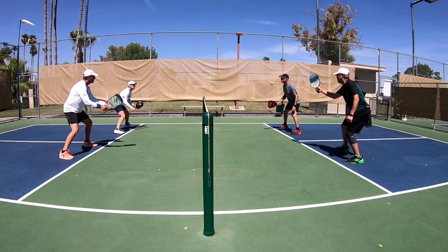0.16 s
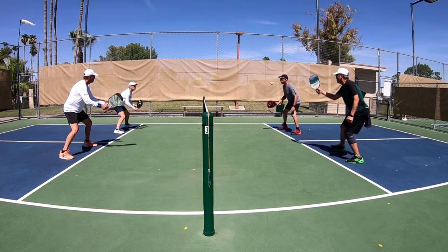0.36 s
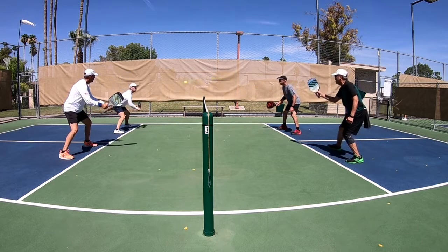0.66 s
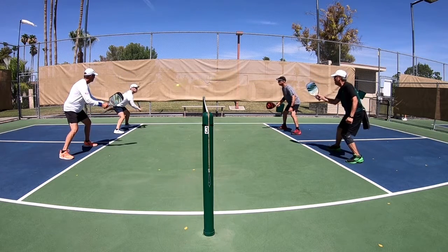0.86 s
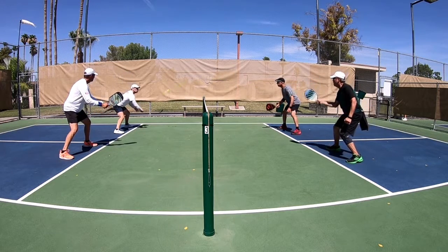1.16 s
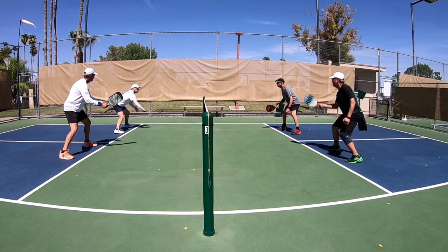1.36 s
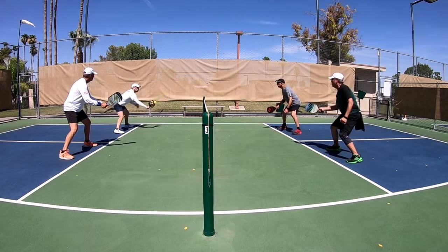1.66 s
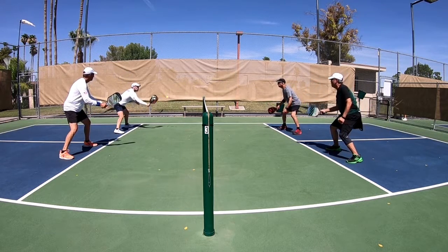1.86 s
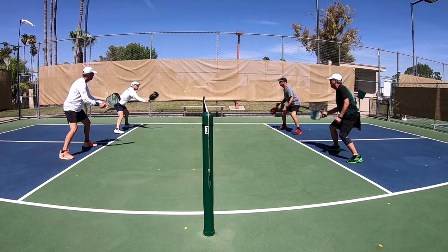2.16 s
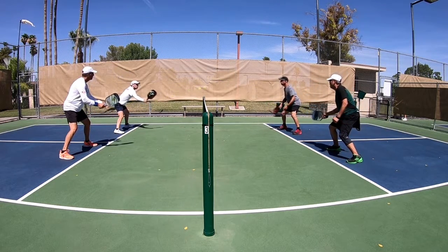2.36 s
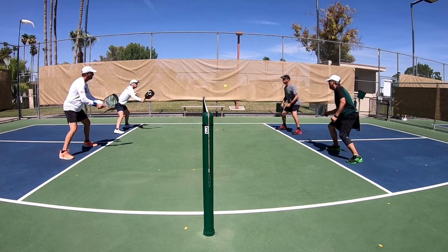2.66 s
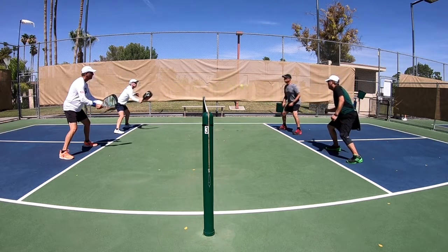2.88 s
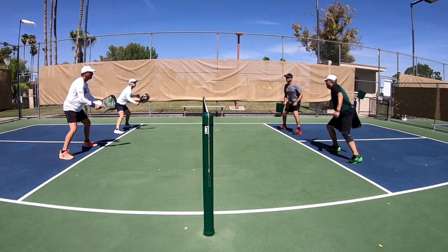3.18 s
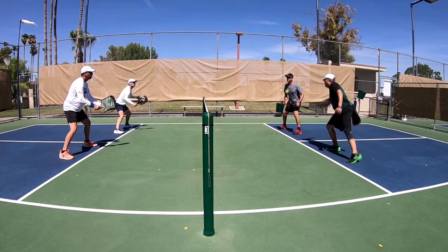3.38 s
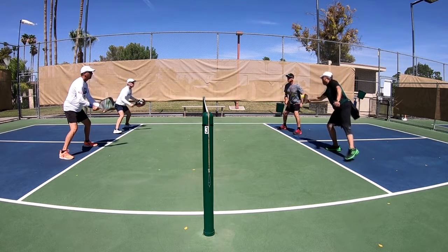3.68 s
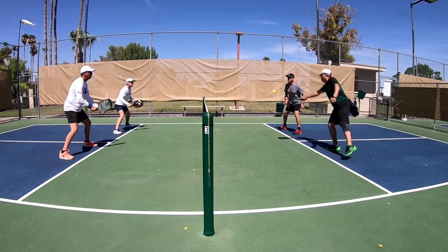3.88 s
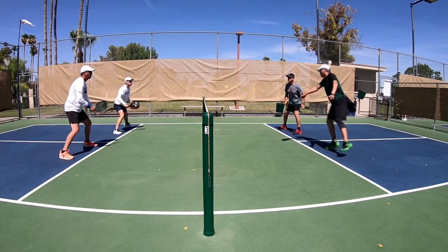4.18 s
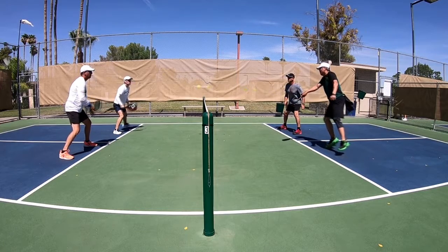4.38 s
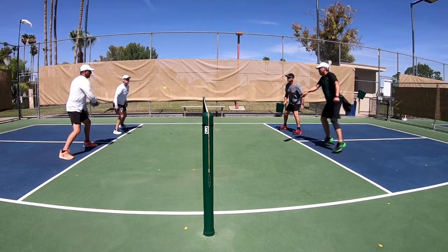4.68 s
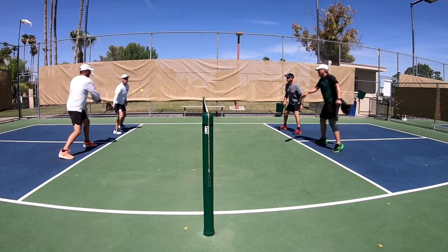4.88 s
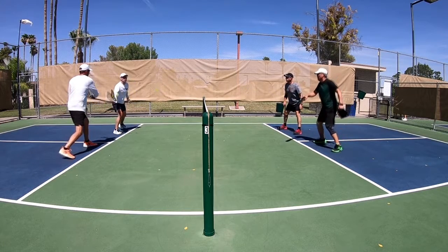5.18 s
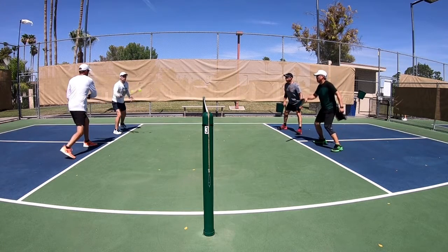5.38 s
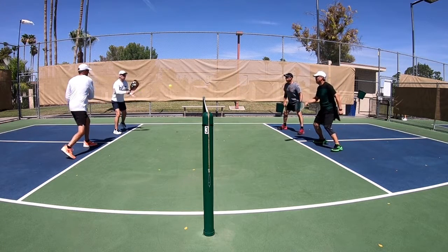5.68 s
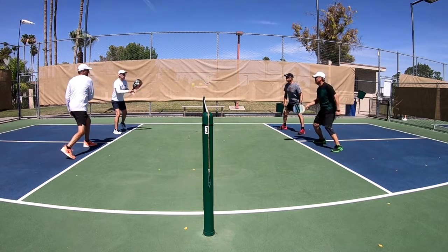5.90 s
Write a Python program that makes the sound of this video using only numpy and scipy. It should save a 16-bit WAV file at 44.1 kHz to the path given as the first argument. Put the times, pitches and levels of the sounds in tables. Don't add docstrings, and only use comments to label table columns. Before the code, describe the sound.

Quiet outdoor air and soft bass wind buffets, heard in stereo from courtside. Three slowed paddle strikes on a hollow plastic ball stand out: a mid-toned pock, then a heavy low ringing thud with a long scattered echo, then a hard bright crack. Between them come faint sole scuffs, dull distant knocks and one wavering shoe squeak just before the last hit. Wind grows stronger in the second half.

```python
import sys
import numpy as np
from scipy import signal
from scipy.fft import rfft, irfft
from scipy.io import wavfile
from scipy.ndimage import uniform_filter1d

SR = 44100
rng = np.random.default_rng(int(sys.argv[2]) if len(sys.argv) > 2 else 0)


def wav_out(sig):
    wavfile.write(sys.argv[1], SR, np.round(np.clip(np.atleast_2d(sig).T, -1, 1) * 32767).astype(np.int16))


def natural_amplitude(level_db):
    exponent = np.asarray(level_db, float) / 20
    return 10 ** exponent


N = 266364

# start in seconds, level in dB, treble against bass in dB,
# smear in seconds, left minus right in dB.
WALL_ECHOES = [
    [(1.642, -52.5, -7.5, 0.014, -3), (1.66, -50, -8, 0.018, 7), (1.682, -52, -5, 0.01, 2),
     (1.729, -43.5, 1.5, 0.0055, 1), (1.758, -52, -8, 0.023, -25.5), (1.819, -52.5, -10, 0.01, -24.5),
     (1.984, -73.5, -14, 0.019, 2.5)],
    [(3.622, -31, -14, 0.011, 7), (3.642, -36, -4, 0.0065, 3.5), (3.681, -36.5, -3, 0.0036, 2.5),
     (3.6905, -27.5, -9.5, 0.0016, -8.5), (3.697, -36.5, -3.5, 0.0072, 0), (3.712, -43.5, 3.5, 0.011, -3),
     (3.744, -37, -12, 0.0074, -2.5), (3.775, -38.5, -4.5, 0.02, -2.5), (3.82, -44, -1, 0.039, -3.5),
     (3.754, -35.5, -10, 0.011, 2), (3.882, -41, -21.5, 0.021, -8), (3.925, -48.5, -11, 0.018, 3),
     (3.965, -46, -15, 0.014, -0.5), (4.025, -43, -16, 0.0069, 1.5), (4.063, -45.5, -18, 0.016, -1),
     (4.11, -50, -15.5, 0.03, 3), (4.19, -53.5, -12, 0.04, -1.5), (4.545, -53, -6.5, .025, -4.5)],
    [(5.131, -36, -12, 0.011, 6.5), (5.15, -38, -14, 0.0094, -1.5), (5.188, -47.5, -2.5, 0.015, 4),
     (5.213, -45, -10, 0.012, 4.5), (5.255, -41, -8, 0.005, 1.5), (5.268, -42.5, -7, 0.012, -3),
     (5.297, -49.5, -6, 0.0091, -6.5), (5.37, -51, -10.5, 0.036, 3.5), (5.314, -49, -13, 0.024, -5),
     (5.454, -50, -35, 0.0068, -11), (5.505, -49.5, -28, 0.008, -2)],
]


def evened(x):
    return x / np.sqrt(np.mean(x ** 2) + 1e-20)


def steady(x, span):
    return x / np.sqrt(uniform_filter1d(x ** 2, span, axis=1) + 1e-20)


def soft(gain):
    return uniform_filter1d(uniform_filter1d(gain, size=60), size=60)


def read(points, hz):
    f, value = np.transpose(points)
    return np.interp(np.log(hz + 1), np.log(f + 1), value)


def band(x, lo_hz, hi_hz):
    return signal.sosfilt(signal.butter(2, [lo_hz, hi_hz], "band", fs=SR, output="sos"), x)


def below(x, hz):
    return signal.sosfilt(signal.butter(8, hz, fs=SR, output="sos"), x)


def add(mix, s, sound, pan_db):
    lag = round(0.6 * pan_db / 2)
    ports = natural_amplitude([[pan_db / 2], [-pan_db / 2]]) * sound
    for channel, port, shift in zip(mix, ports, (-lag, lag)):
        part = channel[round(s * SR) + shift:][:len(port)]
        part += port[:len(part)]


def noise(colour_db, same, patchy_db, size=1024):
    frames, hz = N * 4 // size + 5, np.fft.rfftfreq(size, 1 / SR)[:, None]
    a, b, c, d, patches = rng.standard_normal((frames, len(hz), 5)).T
    patches = uniform_filter1d(patches, size=8, axis=0)
    patches = evened(uniform_filter1d(patches, size=10, axis=1))
    same, left = np.clip(same, -1, 1), a + 1j * b
    right = same * left + np.sqrt(1 - same ** 2) * (c + 1j * d)
    z = np.array([left, right]) * natural_amplitude(colour_db(hz) + patchy_db * patches)
    return signal.istft(z, nperseg=size, noverlap=size * 3 // 4)[1][:, :N]


def ring(modes, tilt_db, damping):
    t = np.arange(SR // 8) / SR
    wave = np.zeros(len(t))
    for hz, width, db in modes:
        decay = np.exp(-np.pi * (width + damping * hz) * t)
        wave += natural_amplitude(db + tilt_db * (hz > 900)) * decay * np.sin(2 * np.pi * hz * t)
    push = 1 - np.exp(-t / 0.00083)
    wave = band(wave * push, 0.5 * modes[0][0], 2100)
    return -wave / abs(wave).max()


def crack(length, top_db=0):
    # frequency in Hz, level in dB.
    skin = [(1500, -15.5), (2500, -31), (3500, -31.5), (4500, -49.5), (5700, -52), (7000, -50.5),
            (9000, -47), (15000, -58)]
    t = np.arange(SR // 8) / SR
    hz = np.fft.rfftfreq(len(t), 1 / SR)
    z = rfft(rng.standard_normal((2, len(t)))) * natural_amplitude(read(skin, hz) + top_db * (hz > 4300))
    burst = evened(irfft(z + .6 * z[::-1], len(t)))
    return burst * (1 - np.exp(-t / .0004)) * np.exp(-t / length)


def blows():
    # start
    # in seconds, level in dB, treble against bass in dB, left minus right in dB.
    contacts = [
        [(1.5772, -34.5, -20.5, 2), (1.5800, -27.5, -0.5, 4.5), (1.5822, -24, -24.5, 4), (1.589, -41, 2, -1),
         (1.594, -37, -25.5, -4), (1.603, -55, -4, 1), (1.611, -45.5, -4.5, -4), (1.616, -47, -2.5, -1),
         (1.622, -48, 0.5, 2), (1.627, -51, -4.5, 5), (1.7295, -50, 3, -1)],
        [(3.5652, -19.5, -2, 5), (3.5675, -18, -26, -5.5), (3.5712, -33.5, 3.5, -5.5), (3.575, -32.5, 2.5, -1),
         (3.5792, -29.5, -3, -3.5), (3.592, -46, 2.5, 1), (3.599, -42, 0, 2.5), (3.603, -39.5, -0.5, -7.5),
         (3.613, -43, -10, 3), (3.6915, -41, -5.5, -4.5)],
        [(5.0885, -23, -12, 7), (5.0925, -38, 3, -2), (5.0975, -27.5, -10, 8.5), (5.1005, -34.5, -22, 8),
         (5.105, -45.5, 12, 3.5), (5.11, -47.5, 8.5, 3.5), (5.2565, -49, -5, 2)],
    ]
    # frequency in Hz, width in Hz, level in dB.
    paddles = [
        [(416.3, 57, 1), (197, 72, -12.5), (555, 64, -16.5), (703, 45, -14), (910, 67, -14), (1273, 77, -15),
         (1518, 90, -17), (1660, 126, -12.5), (1980, 110, -28), (2480, 160, -21)],
        [(265.7, 29.6, 6), (316, 31, -7), (420, 63, -9), (760, 28, -12), (527, 36, -0.5), (674, 42, -3),
         (950, 52, -6), (1026, 45, -16), (1370, 120, -13), (1447, 66, -13.5), (1566, 57, -9), (1890, 40, -21.5),
         (2370, 80, -22)],
        [(189.6, 22.5, -1.5), (475, 39, -5), (835, 160, -13.5), (957, 42, -10), (1150, 36, -10), (1290, 60, -6),
         (1540, 157, 4.5), (1760, 194, 10), (1980, 124, 0.5), (2170, 210, -15.5), (2760, 270, -21.5)],
    ]
    # crack in dB, its change in the returns in dB, its lift above 4.3 kHz in dB.
    crack_levels = [-38, -48.5, -34]
    crack_lates = [-11.5, 1.5, -2]
    crack_tops = [-9.5, -4.5, 1]
    mix, t = np.zeros((2, N)), np.arange(SR // 8) / SR
    for hits, modes, echoes, crack_db, late_db, top_db in zip(
            contacts, paddles, WALL_ECHOES, crack_levels, crack_lates, crack_tops):
        for s, db, treble_db, pan_db in hits:
            add(mix, s, natural_amplitude(db) * ring(modes, treble_db + 14.0, 0.0023), pan_db)
            is_return = s > hits[0][0] + .005
            skin_db = crack_db + db + treble_db + 33.0 + late_db * is_return
            add(mix, s, natural_amplitude(skin_db) * crack(0.0038, top_db), 0.4 * pan_db)
        for s, db, treble_db, smear, pan_db in echoes:
            rise = 1 - np.exp(-t / max(0.19 * smear, .0003))
            fall = np.exp(-(t / max(1.4 * smear, .001)) ** 2)
            wall = rng.standard_normal((2, len(t))) * rise * fall
            ringing = ring(modes, treble_db + 10.5, 0.0078)[None]
            echo = signal.fftconvolve(wall + 0.078 * wall[::-1], ringing, axes=1)
            add(mix, s, natural_amplitude(db - 5.0) * echo / abs(echo).max(), pan_db)
            skin = band(crack(max(smear, .001)), 1600, 4900)
            add(mix, s, natural_amplitude(crack_db + db + treble_db + 27.0) * skin, pan_db)
    return mix + np.array([[-1], [1]]) * 0.14 * band(mix, 1000, 3000)


def falling(since, db, db_per_s):
    return (since > 0) * natural_amplitude(db - db_per_s * abs(since)) ** 2


def answer(since, db, length):
    return (since > 0) * natural_amplitude(db) ** 2 * np.exp(-(since / length) ** 2)


def tails():
    # frequency in Hz, level in dB.
    colours = [
        [(88, -47.5), (150, -17.5), (189, -1), (413, -5.5), (494, -19.5), (576, -8.5), (868, -21.5),
         (1630, -13.5), (3210, -39.5), (4170, -78.5), (7060, -120)],
        [(88, -70.5), (150, -16), (215, -36.5), (257, 4), (345, -1.5), (463, -9.5), (547, -10.5), (663, -22),
         (1470, -29.5), (3210, -51.5), (4170, -67), (7060, -120)],
        [(88, -36), (150, -26.5), (264, -3), (429, -17.5), (488, -20), (569, -16), (1280, -27), (1900, -25),
         (3210, -58), (4170, -61.5), (7060, -120)],
    ]
    # frequency in Hz, width in Hz.
    tones = [
        (189, 11),
        (260.1, 18),
        (187, 20),
    ]
    starts = [1.588, 3.579, 5.098]
    # return off the court in dB, return from beyond
    # the fences in dB, fall of the latter in dB per second.
    near_levels = [(-48, -33.5, -41.5), (-41.5, -30.5, -49.5), (-35, -38, -47)]
    far_levels = [(-58.5, -54, -56.5), (-54, -50.5, -51), (-56.5, -51, -55.5)]
    far_falls = [(34.3, 36, 30), (22.2, 18.8, 26), (20, 27, 96)]
    near_falls = [509, 605.5, 791]
    # level in dB, length in smears.
    refill_levels = (-23, -11, -8.5)
    refill_spreads = (2.4, 1.6, 1.94)
    mix, now = np.zeros((2, N)), np.arange(N) / SR
    for k, (colour, (tone_hz, width)) in enumerate(zip(colours, tones)):
        since = now - starts[k]
        build = 1 - np.exp(-(since / 0.13) ** 2)
        gains = []
        for near_db, far_db, far_fall, wall_db, spread in zip(
                near_levels[k], far_levels[k], far_falls[k], refill_levels, refill_spreads):
            power = falling(since, near_db, near_falls[k]) + build * falling(since, far_db, far_fall)
            for s, db, _, smear, _ in WALL_ECHOES[k]:
                power += answer(now - s, db + wall_db, spread * max(smear, .002))
            gains.append(soft(np.sqrt(abs(uniform_filter1d(power, size=60)))))
        treble_gain, middle_gain, tone_gain = gains
        treble = noise(lambda hz: read(colour, hz) - 40 * (hz < 650), 0.12, patchy_db=2)
        middle = noise(lambda hz: read(colour, hz) - 40 * (abs(hz - tone_hz - 230) > 190),
                       0.38, patchy_db=1.0)
        tone = noise(lambda hz: np.maximum(-6 * ((hz - tone_hz) / width) ** 2, -120),
                     0.78, patchy_db=4.5, size=4096)
        mix += natural_amplitude(-3.0) * treble_gain * evened(treble)
        mix += middle_gain * evened(middle) + tone_gain * steady(tone, 2600)
    return mix


def lead_ins():
    # start in seconds, end in seconds, start level in dB, end level in dB, low edge in Hz,
    # high edge in Hz.
    rushes = [
        (1.333, 1.594, -76, -66, 506, 1580),
        (3.546, 3.567, -62, -52, 800, 2500),
        (5.011, 5.091, -90.5, -55, 1410, 2330),
        (5.03, 5.095, -70, -60.5, 348, 1310),
        (5.013, 5.092, -90, -80, 2400, 6500),
        (1.563, 1.580, -84, -76, 2300, 3900),
    ]
    mix = np.zeros((2, N))
    for start, end, start_db, end_db, lo_hz, hi_hz in rushes:
        rush = rng.standard_normal((2, SR // 2))[:, :round((end - start) * SR)]
        rush = band(band(rush + 0.13 * rush[::-1], lo_hz, hi_hz), lo_hz, hi_hz)
        rush = evened(below(rush, 1.4 * hi_hz))
        length = rush.shape[1]
        swell = natural_amplitude(np.linspace(start_db, end_db, length)) * signal.windows.tukey(length, .15)
        add(mix, start, swell * rush, 0)
    return mix


def squeaks():
    # start in seconds, length in seconds, first pitch in Hz, last pitch in Hz, level in dB.
    slides = [
        (1.329, 0.17, 1250, 1384, -67),
        (2.6, 0.34, 1016, 761, -78.5),
        (4.839, 0.021, 859, 538, -42.5),
        (4.86, 0.072, 606.5, 674, -40),
        (4.932, 0.105, 648, 680, -62.5),
        (5.013, 0.11, 1980, 2040, -67),
        (4.846, 0.12, 1950, 1940, -67),
    ]
    # left minus right in dB, share of the length at firmest grip,
    # stutter in dB, pitch arch in Hz, grip at the end in dB.
    grips = [(-7, 0.52, -0.5, 168.5, -7), (1.5, 0.32, 3, 0, -11), (-6, 1, 1.5, -3, -8),
             (-6, 0.22, 1.5, 24.5, -24), (-6, 0.22, 5, 21.5, -2.5), (5, 0.81, 1, -17, -10),
             (4, .3, -2, 0, -9)]
    overtones = [1, -17.5, -24]

    def drift(span, length):
        return evened(uniform_filter1d(rng.standard_normal(SR // 2), size=span))[:length]

    mix = np.zeros((2, N))
    for (s, length, first_hz, last_hz, top_db), (pan_db, firmest, stutter_db, arch_hz, end_db) in zip(slides, grips):
        u = np.arange(0, 1, 1 / (length * SR))
        hz = first_hz + (last_hz - first_hz) * u ** 0.71 + arch_hz * np.sin(np.pi * u)
        db = top_db + np.interp(u, [0, np.clip(firmest, .05, .95), 1], [-11.5, 0, end_db])
        turns = np.cumsum(hz * (1 + .04 * drift(150, len(u)))) / SR
        db = db + 2 * drift(350, len(u)) + stutter_db * np.sin(2 * np.pi * 65.5 * length * u)
        rasp = 0.6 + drift(70, len(u))
        tone = np.zeros(len(u))
        for k, overtone_db in enumerate(overtones):
            tone += natural_amplitude(overtone_db) * (rasp if k else 1) * np.sin(2 * np.pi * (k + 1) * turns)
        tone = np.pad(natural_amplitude(db) * tone * signal.windows.tukey(len(u), .2), (0, SR // 50))
        add(mix, s, band(band(tone, 300, 2100), 300, 2100), pan_db)
    return mix


def scuffs():
    # start in seconds, level in dB, top of the band in Hz (the band reaches down to
    # about half of it), length in seconds, left minus right in dB.
    drags = [(0.148, -84, 460, 0.03, -6), (0.459, -71, 440, 0.017, -4), (1.412, -62, 520, 0.042, -3),
             (1.488, -57.5, 497, 0.025, 0), (1.533, -54.5, 554, 0.049, -6), (3.054, -70, 471, 0.014, -2.5),
             (3.206, -67, 484, 0.048, 6), (3.306, -62, 452, 0.049, -4), (3.395, -65.5, 570, 0.036, 10.5),
             (3.465, -57.5, 498, 0.045, 5), (3.512, -48, 450, 0.065, -5), (4.437, -57, 1034, 0.095, 4.5),
             (4.55, -63.5, 478, 0.1, 0), (5.589, -54, 683, 0.057, -5.5), (5.65, -58, 457, 0.03, 3.5),
             (5.708, -62.5, 490, 0.027, 10), (5.737, -66, 447, 0.04, 2), (5.847, -71, 450, 0.047, 11)]
    taps = [(1.533, -73, 2700, 0.0056, -2.5), (4.014, -50.5, 1070, 0.0069, 2),
            (4.037, -67.5, 1980, 0.0086, 8.5), (4.054, -65.5, 1150, 0.0069, 3),
            (4.275, -56.5, 596, 0.012, 6.5), (4.705, -50.5, 527, 0.012, -3), (4.742, -58, 1290, 0.02, 0),
            (4.8148, -50, 997, 0.0065, -5), (4.842, -58.5, 1850, 0.017, -6.5),
            (4.856, -53.5, 1700, 0.015, 10), (4.869, -52.5, 1570, 0.0091, 5), (4.883, -61, 1800, 0.0071, 1),
            (4.965, -63, 1300, 0.023, 0), (4.826, -58.5, 1480, 0.013, 0), (5.614, -56, 1210, 0.036, 3)]
    mix, t = np.zeros((2, N)), np.arange(SR // 4) / SR
    for s, db, hz, length, pan_db in [*drags, *taps]:
        rise = 1 - np.exp(-t / max(0.53 * length, .0005))
        grit = rng.standard_normal((2, len(t))) * rise * np.exp(-t / max(length, .003))
        grit = band(band(grit + 1.6 * grit[::-1], 0.49 * hz, 1.096 * hz), 340, 3800)
        add(mix, s, natural_amplitude(db + 0.5) * grit / abs(grit).max(), pan_db)
    return mix


def knocks():
    # start in seconds, level in dB, frequency in Hz, width in Hz, left minus right in dB.
    hollows = [
        (3.4, -52, 570, 45, 7.5),
        (3.451, -51.5, 550, 52, 5),
        (3.383, -66, 1800, 110, -2),
        (3.558, -45.5, 1100, 100, -2),
        (3.3, -43, 760, 110, -5),
    ]
    mix, t = np.zeros((2, N)), np.arange(SR // 10) / SR
    for s, db, hz, width, pan_db in hollows:
        envelope = (1 - np.exp(-t / .002)) * np.exp(-np.pi * width * t)
        add(mix, s, natural_amplitude(db) * envelope * np.sin(2 * np.pi * hz * t), pan_db)
    return mix


def wind():
    # time in seconds, level in dB, upper wind in dB, left minus right in dB.
    gusts = [(0.01, -40, -18.5, 8.5), (0.199, -43.5, -22.5, 4), (0.511, -31, -28.5, 0),
             (0.767, -44, -14, -7.5), (0.883, -55, -12.5, 6.5), (1.009, -34.5, -31, 0),
             (1.586, -37.5, -6, -4), (1.851, -31, -20, 6), (2.109, -31, -15, 2.5), (2.495, -44.5, -20, 3.5),
             (2.681, -36.5, -21, 5), (2.885, -37, -34, -4), (3.085, -38.5, -9, 7.5), (3.2, -30, -23, 11),
             (3.29, -32, -23.5, 13), (3.415, -36.5, -29, 15), (3.691, -23, -21.5, 5.5),
             (3.965, -29, -21, 15.5), (4.108, -28, -19, 11), (4.201, -25.5, -23, 9.5),
             (4.305, -27.5, -18, 2.5), (4.475, -40, -16, -9), (4.717, -30, -24, 11.5), (4.881, -28, -22, 9),
             (5.157, -29, -23, -2.5), (5.256, -30, -17.5, 11.5), (5.59, -51, -13, 4),
             (5.69, -33.5, -17, 7.5), (5.862, -42, -24, 1.5), (5.951, -36.5, -24, -1.5)]
    breeze = [
        (0.0, -41.5, -15, 1),
        (1.3, -38.5, -18.5, -1),
        (2.9, -37, -22.5, 0),
        (3.1, -35.5, -15, 10),
        (4.3, -30.5, -20, 1.5),
        (5.301, -32, -16, 1),
        (5.6, -40, -14.5, 2),
        (6.04, -33.5, -24, 16),
    ]
    # frequency in Hz, level in dB.
    low_colour = [(5.9, -35.5), (10, 5.5), (22, -2.5), (33, 0), (46, -15), (90, -34.5), (120, -53),
                  (200, -120)]
    top_colour = [(50, -10.5), (75, 2), (130, -15.5), (200, -27), (300, -34)]
    now, side = np.arange(0, N + 64, 64) / SR, np.array([[.5], [-.5]])
    s, *columns = np.transpose(breeze)
    db, top_db, pan_db = (np.interp(now, s, c) for c in columns)
    low_power = natural_amplitude(db + side * pan_db) ** 2
    top_power = low_power * natural_amplitude(top_db) ** 2
    for s, db, top_db, pan_db in gusts:
        spread = np.where(now < s, .014, .055)
        eddy = natural_amplitude(db + side * pan_db) ** 2 * np.exp(-((now - s) / spread) ** 2)
        low_power = low_power + eddy
        top_power = top_power + eddy * natural_amplitude(top_db) ** 2
    low_gain, top_gain = (uniform_filter1d(np.sqrt(np.repeat(p, 64, axis=1)[:, :N]), size=256)
                          for p in (low_power, top_power))
    low = noise(lambda hz: read(low_colour, hz) - 30 * (hz > 100), 0.06, patchy_db=0, size=4096)
    top = noise(lambda hz: read(top_colour, hz) - 40 * (hz > 320), 0.55, patchy_db=-6.5, size=2048)
    return low_gain * steady(low, 5000) + natural_amplitude(-4.0) * top_gain * steady(top, 4000)


def thumps():
    # centre in seconds, level in dB, frequency in Hz, left minus right in dB.
    slaps = [(1.593, -24.5, 56.3, -3.5), (2.111, -41.5, 53.6, 9), (3.079, -29, 48.7, 13.5),
             (3.12, -46, 130, 8), (3.672, -28.5, 40, 5.5), (3.72, -29, 35, 4.5), (1.88, -30, 44.6, 3),
             (3.186, -26, 45.2, 6), (3.215, -24.5, 48, 10.5), (3.314, -27.5, 35, 14.5),
             (4.095, -28, 43.8, 10), (4.715, -28, 44.1, 6.5), (4.895, -27.5, 39.3, 8),
             (5.103, -35, 48, -11), (5.284, -34, 49, 13), (5.705, -32.5, 51, 5)]
    mix, t = np.zeros((2, N)), np.arange(-SR // 20, SR // 20) / SR
    for s, db, hz, pan_db in slaps:
        push = np.cos(2 * np.pi * hz * t) * np.exp(-(t * hz / 0.46) ** 2)
        add(mix, s + t[0], natural_amplitude(db) * push, pan_db)
    return mix


def air():
    # frequency in Hz, level in dB.
    colour = [(59, -39), (100, -0.5), (126, -4), (222, -9), (364, -12), (446, -18.5), (486, -17.5),
              (650, -26), (857, -27.5), (1620, -27.5), (2170, -37), (3210, -45), (4170, -70), (7060, -120)]
    # frequency in Hz, left-right likeness.
    likeness = [(60, -0.086), (130, -0.21), (280, -0.54), (600, -0.066), (1280, 0.25), (2760, -0.44)]
    same = read(likeness, np.fft.rfftfreq(1024, 1 / SR))[:, None]
    return natural_amplitude(-63.5) * evened(noise(lambda hz: read(colour, hz) - 30 * (hz < 100), same, patchy_db=2.5))


def mirror_tones(dry):
    treble = band(band(dry, 1900, 5000), 840, 6000)
    mirror = treble * np.cos(2 * np.pi * 12000 * np.arange(N) / SR)
    return natural_amplitude(-19) * band(mirror, 6600, 13300)


def join_ticks():
    # time in seconds, level in dB, left minus right in dB.
    loud_joins = [(1.5808, -50.5, 1.5), (3.5644, -51, -1), (1.602, -59.5, 3), (1.730, -57.5, 3),
                  (3.5714, -57, 0), (3.586, -59, 1.5), (3.6287, -58, -1.5), (3.650, -57, 3),
                  (3.6927, -45, -2.5), (3.778, -58, -1.5), (4.866, -55, 2), (4.887, -57.5, 1.5),
                  (5.2712, -60, 2), (5.314, -62, 0), (5.335, -55, 2), (5.378, -62, 0)]
    faint_joins = [(3.08, -78.5, 1.5), (3.1153, -82, 4.5), (3.1368, -79, 3), (3.1786, -76, 2),
                   (3.2218, -76, 8), (3.2859, -71, 7.0), (3.307, -67.5, 1.5), (3.456, -80, -2.5),
                   (3.7074, -78, 0.5), (3.7554, -75, 0.0), (3.7984, -71, -1.0), (3.841, -69.5, 1.5),
                   (3.8834, -82, -1), (3.9474, -81, -2), (3.9693, -75.5, 4.5), (4.097, -67, 11.5),
                   (4.1174, -79, 7), (4.1814, -81, 3.5), (4.2027, -73, 5.5), (4.2668, -73, -0.5),
                   (4.3313, -77, -1), (4.6085, -77, 3.0), (4.6299, -76, 3), (4.6942, -70, 6),
                   (4.7581, -80, 2), (4.8219, -72, 3), (4.9933, -75, 0), (5.3981, -79, 2.5),
                   (5.7394, -81, -0.5), (5.8464, -81, 0)]
    loud, faint = np.zeros((2, 2, N))
    for layer, joins in ((loud, loud_joins), (faint, faint_joins)):
        for s, db, pan_db in joins:
            add(layer, s, natural_amplitude(db) * np.ones(1), pan_db)
    return natural_amplitude(1.5) * band(loud, 700, 7600) + natural_amplitude(5.5) * band(faint, 2500, 14000)


def scene():
    court = blows() + tails() + lead_ins()
    shoes = below(squeaks() + scuffs(), 3000)
    return court + shoes + knocks() + wind() + thumps() + air()


def band_limit(x):
    return signal.sosfilt(signal.butter(12, 15600, fs=SR, output="sos"), x)


def record(dry):
    hiss = natural_amplitude(-104) * rng.standard_normal(dry.shape)
    return band_limit(dry + mirror_tones(dry) + join_ticks() + hiss)


dry = scene()
out = record(dry)
wav_out(out)
```